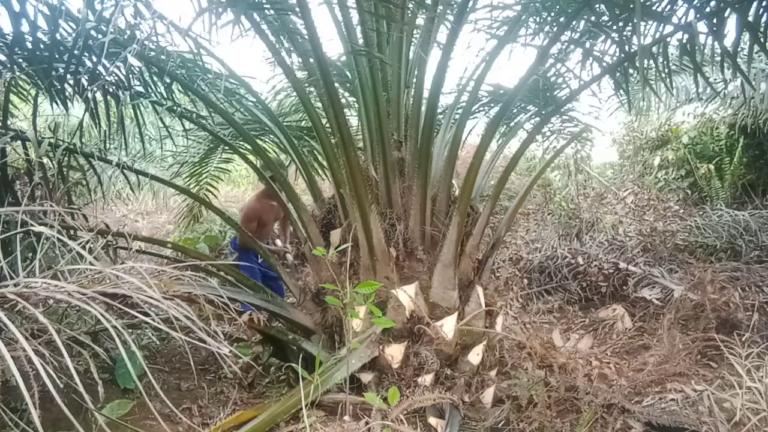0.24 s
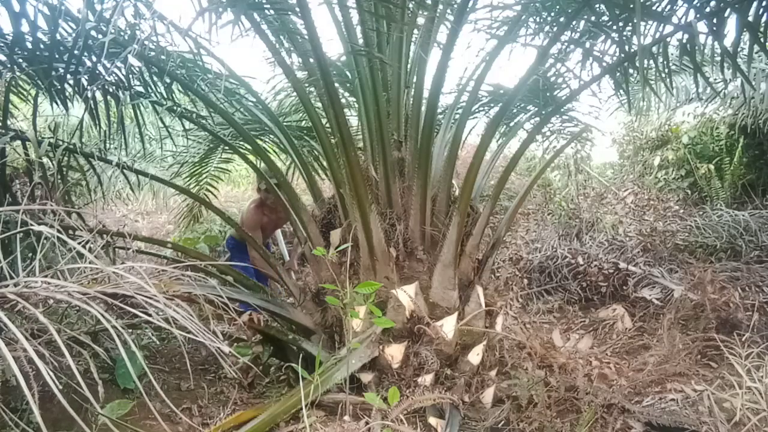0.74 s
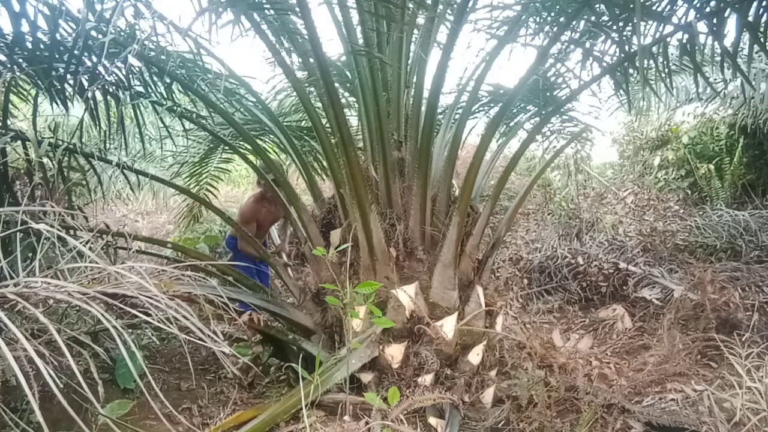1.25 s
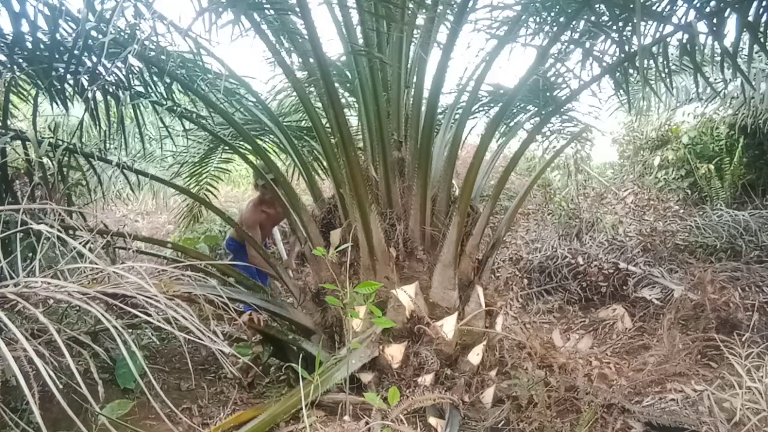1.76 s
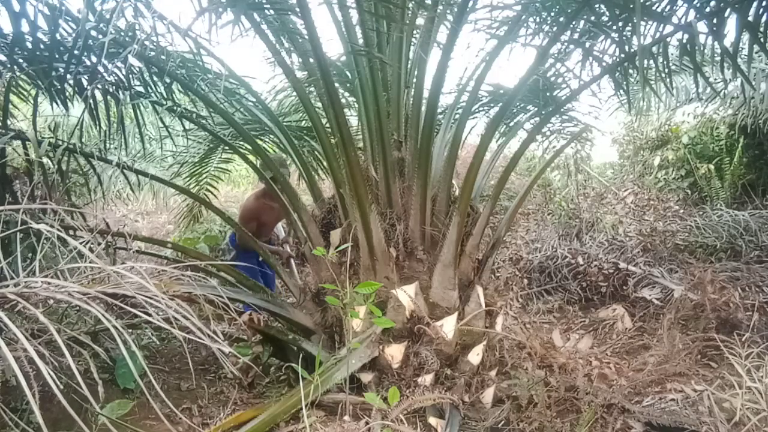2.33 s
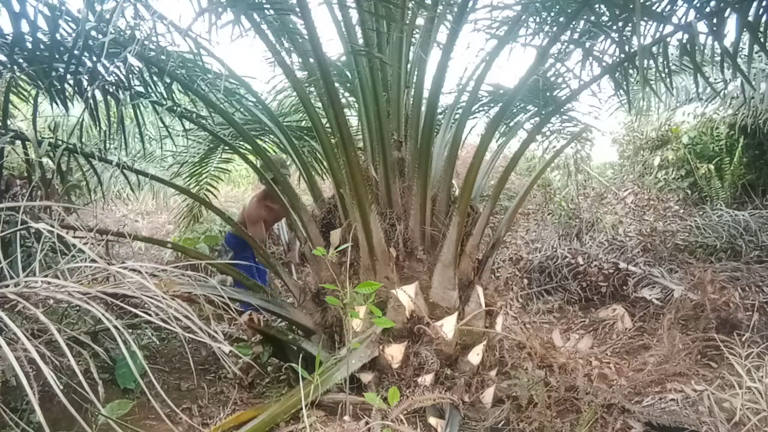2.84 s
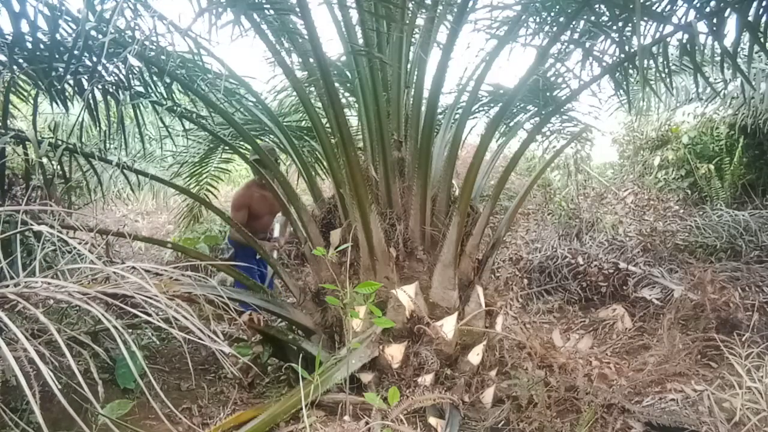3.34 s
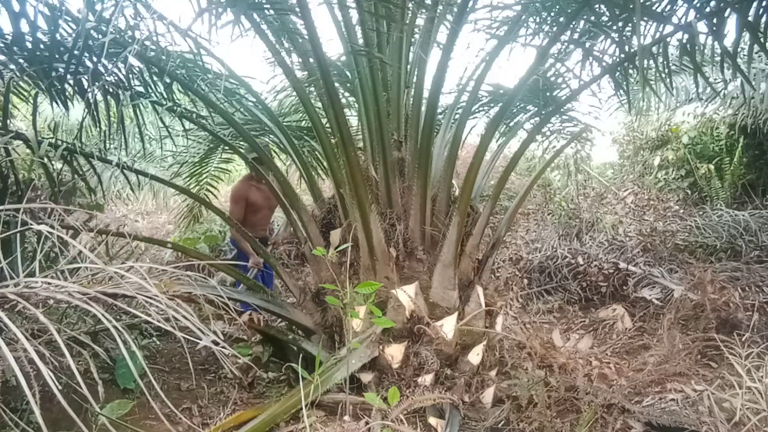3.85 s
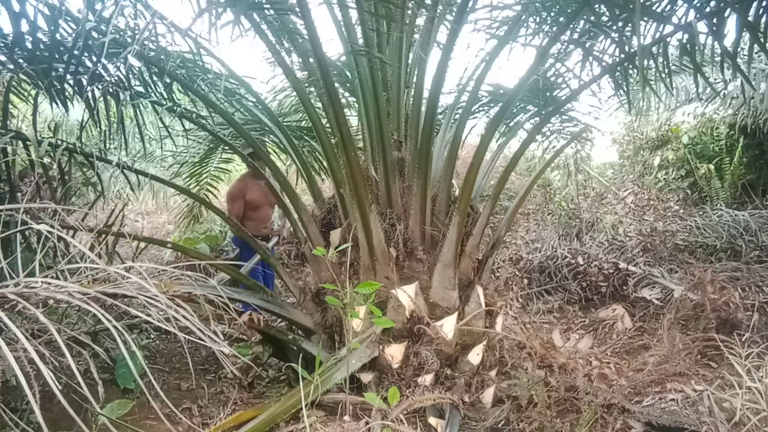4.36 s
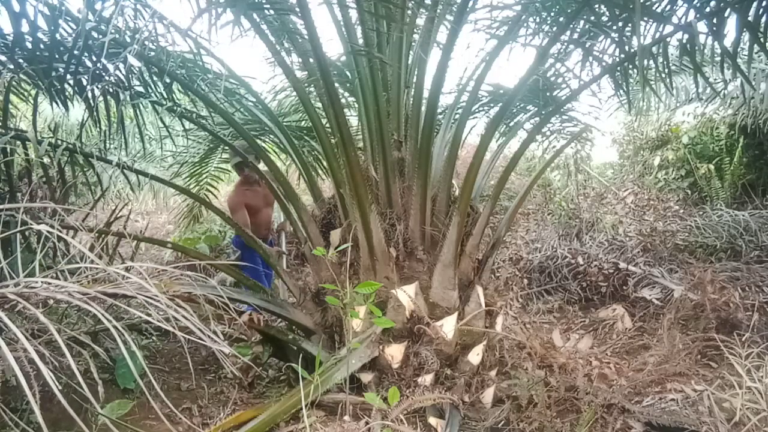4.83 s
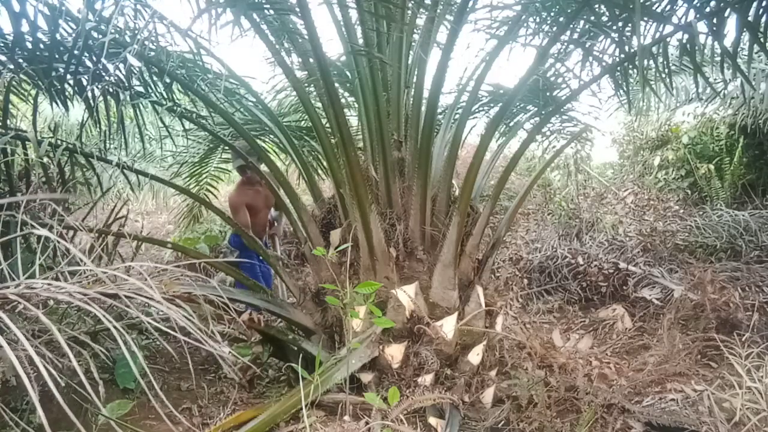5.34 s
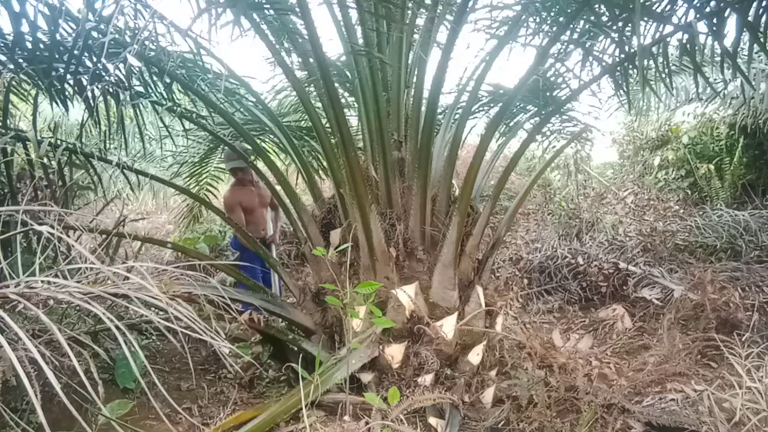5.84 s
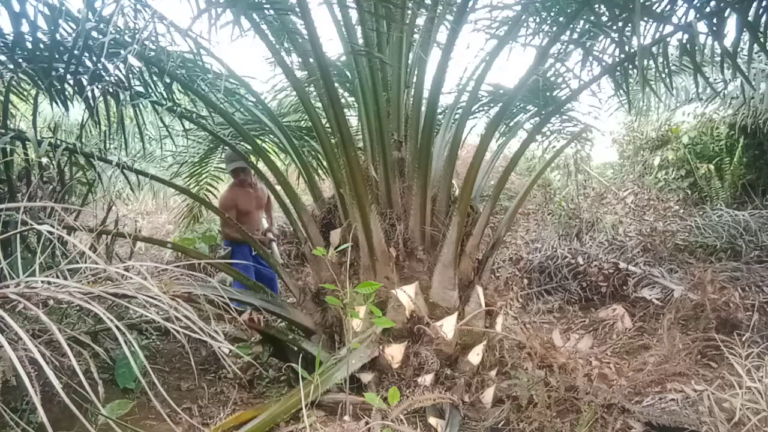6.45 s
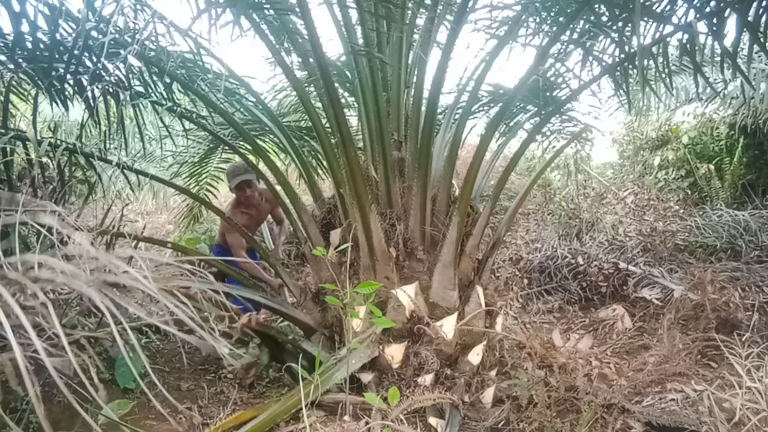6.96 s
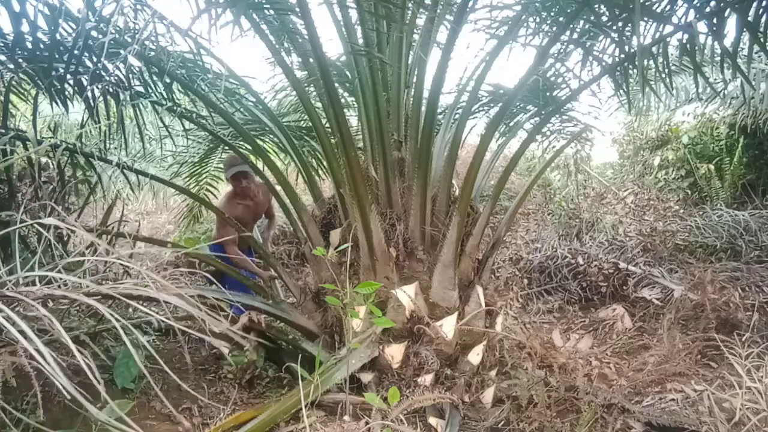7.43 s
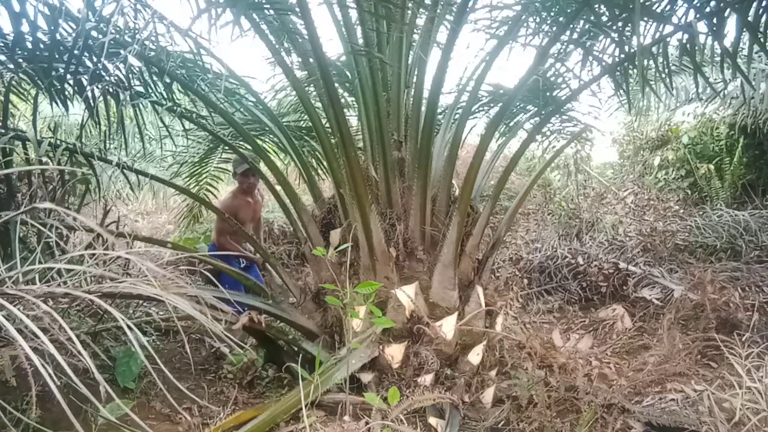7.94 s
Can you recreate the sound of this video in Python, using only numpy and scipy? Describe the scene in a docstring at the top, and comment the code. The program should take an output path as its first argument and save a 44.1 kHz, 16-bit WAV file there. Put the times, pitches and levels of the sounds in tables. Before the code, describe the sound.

Leaves rustle from the start under constant high insect buzzing. Irregular chops follow, each a quick crunch of ripping fibres with a damped knock on the stalk, a brief high steel ring and a swish of fronds. Soft blade slides and dull bumps fill the gaps. The cutting is several metres from the microphone in an open plantation, with a faint foliage echo.

```python
"""A worker prunes an oil palm with a steel chisel on a pole, some metres away in a plantation.
From the start, a shrill band of insects, a low rumble and hiss in the air, and leaves already rustling.
Soon the blade slides on the cut; the first thrust comes near 0.7 s and others follow every second or so.
Each tears wet fibres (noise crackle), knocks the stalk (damped jolts), rings the blade (resonances) and shakes
the leaves; those near 3.7 and 7 s tear hardest, then a weaker one near 7.6 s, with leaves still rustling."""
import sys
import numpy as np
from scipy import signal
from scipy.fft import rfft, irfft, next_fast_len
from scipy.io import wavfile

SR = 44100
rng = np.random.default_rng(int(sys.argv[2]) if len(sys.argv) > 2 else 0)


def transcribe(u):
    """Save the signal u as a 16-bit wav file named by the first command-line argument.

    u: samples, shape (n,) or (channels, n), limited to [-1, 1]; the rate is SR.
    q: integer samples, one column per channel.
    """
    v = np.clip(np.atleast_2d(u).T, -1, 1)
    q = np.round(v * 32767).astype(np.int16)
    wavfile.write(sys.argv[1], SR, q)


N = 361179
TIME_S = np.arange(N) / SR

# distant air, spectrum: hz, relative_db
AIR_SPECTRUM = [(20, -32.5), (50, -7), (100, 5.5), (200, 0), (350, -7), (700, -14), (1300, -20.5),
                (3000, -19), (6000, -17.5), (9000, -36), (16000, -53)]
# faint wavering whine: hz, width_hz (doubled in each of two cascaded resonators), level_db
WHINE = (1250, 90, -85)
# insect band and its octave, spectrum: hz, relative_db
INSECT_SPECTRUM = [(5000, -43), (5900, -22), (6600, -22.5), (6850, -2.5), (7200, 3.5), (7650, 1.5),
                   (8100, -11.5), (8600, -25.5), (9200, -52.5), (13600, -52.5), (14500, -36), (15500, -34)]
# brushing leaflets, spectrum: hz, relative_db
LEAF_SPECTRUM = [(30, -41.5), (100, -14), (400, -15), (900, -12), (1600, -12.5), (2400, -13), (4000, -5),
                 (6000, 0), (7500, -5), (9000, -15.5), (12000, -30.5), (16000, -28)]
# fronds set swaying: start_s, rise_s, t60_s, level_db
SWAYS = [(0.0, 0.0017, 0.87, -55), (0.232, 0.0087, 0.65, -54), (0.43, 0.056, 1.2, -61),
         (0.7, 0.017, 0.19, -42), (1.13, 0.045, 0.87, -51.5), (1.8, .03, 2.4, -54), (2.03, 0.11, 2.2, -53),
         (2.751, 0.043, 1.01, -44), (3.2, 0.09, 2, -64), (3.601, 0.0044, 1.7, -34.5),
         (3.728, 0.046, 0.72, -28), (4.06, 0.097, 0.93, -44.5), (4.598, 0.018, .25, -97),
         (4.933, 0.0065, 0.59, -37), (5.42, 0.028, 1.2, -53), (5.52, 0.064, 0.33, -45.5),
         (5.891, 0.011, 0.93, -43), (6.61, 0.23, 0.78, -50.5), (6.941, 0.04, 0.96, -31),
         (7.4, 0.25, 0.66, -53), (7.75, .35, 1.4, -57.5)]
# steel blade modes: hz, width_hz (halved while sliding), gain_db
BLADE_MODES = [(3500, 25, -25.5), (3150, 27, -12), (3970, 43, -17.5), (4030, 18, -8), (5200, 37, -17.5),
               (5410, 12, -0.5), (5870, 14, 11), (6990, 16, 3.5)]
# blade sliding or clinking: start_s, rise_s, t60_s, level_db
SLIDES = [(0.252, 0.022, 0.43, -60.5), (1.195, 0.061, 0.61, -53.5), (2.21, 0.028, 0.61, -50),
          (3.604, 0.0024, 0.12, -50), (5.505, 0.0075, 0.51, -50.5)]
# dull bumps of stalks and trunk: start_s, level_db, pitch_hz
BUMPS = [(1.161, -62, 443), (1.202, -61, 700), (2.142, -51.5, 435), (2.191, -58, 850), (2.742, -54, 75),
         (2.964, -48.5, 460), (2.992, -54, 623), (3.826, -46.5, 93), (4.945, -45.5, 147),
         (4.99, -52.5, 282), (5.33, -65, 650), (5.517, -55, 110), (5.769, -61.5, 200), (7.022, -47.5, 310),
         (7.427, -57.5, 694), (7.57, -61, 150)]
# hard rind splitting: start_s, level_db
SPLITS = [(0.258, -49), (0.709, -24), (1.757, -35.5), (1.818, -39), (2.654, -43), (3.772, -35.5),
          (3.795, -37.5), (5.889, -40.5)]
# edge driven into a stalk: start_s, rise_s, length_s, relative_tear_db, knock_db, knock_pitch_hz
CHOPS = [(0.676, 0.015, 0.036, -20.5, -39.5, 520), (0.704, 0.0038, 0.011, -21, -29.5, 320),
         (0.761, .005, 0.015, -32.5, -32, 580), (1.742, 0.0079, 0.026, -24, -39.5, 500),
         (1.804, .002, 0.018, -29, -32, 616), (1.862, .002, 0.0032, -43, -49, 900),
         (2.651, .001, 0.023, -38.5, -51.5, 340), (2.674, .008, 0.021, -26, -41.5, 686),
         (2.702, 0.0054, 0.02, -26.5, -33, 700), (3.602, 0.00088, 0.0015, -35, -42, 330),
         (3.766, 0.0033, .011, -23.5, -39.5, 517), (4.931, 0.0028, 0.013, -24.5, -31, 620),
         (5.509, .001, 0.0194, -37.5, -44, 190), (5.89, 0.0008, 0.0053, -30.5, -45, 246),
         (6.926, 0.0028, 0.0061, -17.5, -27, 828), (6.938, .004, 0.017, -19.5, -24, 760),
         (6.952, .002, 0.0076, -19, -21.5, 420), (6.982, .003, 0.0043, -31, -27, 620),
         (7.559, 0.0029, 0.011, -37.5, -40, 250)]
# fibre strips ripping without a knock: start_s, relative_tear_db, tilt_db_per_octave
RIPS = [(1.492, -39, 4.5), (1.539, -44, 4), (1.604, -43.5, 4), (2.192, -42.5, -0.5), (2.867, -37, -1),
        (3.676, -24.5, 10.5), (3.749, -28, 11), (3.807, -23, 8.5), (3.846, -23, 7.5), (4.468, -43, 4),
        (5.443, -44, 2.5), (5.585, -43, 7), (5.791, -38.5, 0.5), (6.985, -23, 7.5), (7.057, -33, 4)]
# tearing fibres, spectrum before tilt: hz, relative_db
FIBRE_SPECTRUM = [(40, -49.5), (110, -8.5), (400, -21.5), (1100, -12), (1550, -10), (1900, -9),
                  (2600, -6.5), (4200, 0.5), (6300, 1.5), (7500, 0.5), (8500, -12), (11000, -22.5),
                  (16000, -30.5)]
# thick fibres parting: start_s, peak_db
SNAPS = [(0.709, -18), (1.4933, -31.5), (3.6027, -11.5), (3.6825, -29), (3.768, -18), (3.845, -17.5),
         (4.9369, -18.5), (5.7925, -34), (6.9893, -17), (6.9955, -14), (7.0598, -29)]
# ring of a parting fibre: hz, width_hz (of each of two cascaded resonators), relative_db
SNAP_MODES = [(4200, 1600, 3.5), (6030, 320, 10), (4630, 110, 0), (6300, 130, -29.5)]
# microphone port resonances: hz, width_hz, boost_db
PORT_MODES = [(1252, 62, 8.5), (15110, 890, 18)]

AIR_DB, INSECT_DB = -70.5, -47
SWAY_HOLD_S = 0.042
SLIDE_HOLD_RATIO = 0.97  # hold / rise
KNOCK_LAG_S = 0.003004  # before the one-cycle advance in wood()
THUD_HZ, THUD_REL_KNOCK_DB, THUD_LAG_S, THUD_LENGTH_S = 205, -16, 0.005, 0.015
RIND_HZ, RIND_LENGTH_S = 2030, 0.0056
BUMP_LENGTH_S = 0.02
CHOP_T60_S, CHOP_TILT_DB_PER_OCTAVE = 0.13, -1.24
RIP_RISE_S, RIP_HOLD_S, RIP_T60_S = 0.0011, 0.0094, 0.11
CUTOFF_HZ = 15550


def from_db(db):
    """Decibels to gain."""
    return 10 ** (np.asarray(db) / 20)


def rms_one(x):
    """Scale to unit power."""
    return x / np.sqrt(np.mean(x ** 2) + 1e-20)


def add(out, start_s, sound):
    """Mix a sound in from start_s."""
    start = max(round(start_s * SR), 0)
    out[start:start + len(sound)] += sound[:max(N - start, 0)]


def colour(x, spectrum, tilt_db_per_octave=0):
    """Impose a tilted spectrum; unit power."""
    hz, level_db = np.transpose(spectrum)
    size = next_fast_len(len(x))
    octave = np.log2(np.maximum(np.fft.rfftfreq(size, 1 / SR), 1))
    gain_db = np.interp(octave, np.log2(hz), level_db) + tilt_db_per_octave * octave
    return rms_one(irfft(rfft(x, size) * from_db(gain_db), size)[:len(x)])


def wander(size, per_s):
    """Random curve: unit-spread values, per_s a second, joined by lines."""
    values = rng.standard_normal(size)
    return np.interp(np.arange(size) * per_s / SR, np.arange(size), values)


def resonate(x, hz, width_hz):
    """Two-pole resonance with gain 1 at its top."""
    r = np.exp(-np.pi * width_hz / SR)
    zeros = np.array([1, 0, -1]) * (1 - r * r) / 2
    poles = [1, -2 * r * np.cos(2 * np.pi * hz / SR), r * r]
    return signal.lfilter(zeros, poles, x + 1e-18)


def crackle(size, per_s, spread_db, clump_db):
    """Tiny snaps of uneven strength that come in clumps."""
    born = rng.random(size) < per_s / SR
    strength_db = spread_db * rng.random(size) + clump_db * wander(size, 490)
    return born * rng.standard_normal(size) * from_db(strength_db)


def stroke(t_s, rise_s, hold_s, t60_s):
    """Force builds up, holds, then dies away exponentially."""
    rise = np.clip(t_s / rise_s, 0, 1) ** (3 / 4)
    return rise * from_db(-60 * np.maximum(t_s - rise_s - hold_s, 0) / t60_s)


def scatter(x, spread_s, share_db):
    """Many slightly delayed paths ripple the spectrum."""
    t_s = TIME_S[:SR // 8]
    paths = rng.standard_normal(len(t_s)) * np.exp(-t_s / spread_s)
    delayed = signal.fftconvolve(x, paths / np.linalg.norm(paths))[:N]
    share = from_db(share_db)
    return (x + share * delayed) / np.hypot(1, share)


def open_air():
    """Low distant rumble and soft hiss from shaped noise; faint whine from resonated noise."""
    hz, width_hz, level_db = WHINE
    whine = resonate(resonate(rng.standard_normal(N), hz, 2 * width_hz), hz, 2 * width_hz)
    waver_db = 2 * wander(N, 26)
    air = from_db(AIR_DB) * colour(rng.standard_normal(N), AIR_SPECTRUM)
    return air + from_db(level_db + waver_db) * rms_one(whine)


def insects(flutter_db=1.05, flutter_per_s=130):
    """Many far insects merge into one shrill, fluttering band and its octave."""
    level_db = INSECT_DB + flutter_db * wander(N, flutter_per_s)
    return from_db(level_db) * colour(rng.standard_normal(N), INSECT_SPECTRUM)


def blade(drive):
    """Steel rings in its modes when rubbed or struck."""
    return sum(from_db(db) * resonate(drive, hz, width_hz) for hz, width_hz, db in BLADE_MODES)


def flicker(x, depth_db, per_s):
    """Bands swell and fade independently as different leaves touch; the top stays steady."""
    out, rest = 0, x
    for hz in np.geomspace(400, 6400, 5):
        low = signal.sosfiltfilt(signal.butter(3, hz, fs=SR, output="sos"), rest)
        out = out + low * from_db(depth_db * wander(N, per_s))
        rest = rest - low
    return out + rest


def leaflet_ticks(per_s, width_hz, count=30):
    """Stiff leaflets flick now and then, each ringing briefly at its own pitch."""
    pitches_hz = np.linspace(1900, 6600, count) + rng.normal(0, 60, count)
    ticks = 0
    for hz in pitches_hz:
        flicks = crackle(N, per_s, spread_db=0.5, clump_db=-4)
        ticks = ticks + hz * resonate(flicks, hz, width_hz)  # gain grows with pitch
    return rms_one(ticks)


def leaves(ring_db=-9):
    """Leaflets brush each other and the blade while the fronds sway."""
    power = sum((from_db(db) * stroke(TIME_S - start_s, rise_s, SWAY_HOLD_S, t60_s)) ** 2
                for start_s, rise_s, t60_s, db in SWAYS)
    touches = crackle(N, per_s=6000, spread_db=5, clump_db=2)
    brush = scatter(colour(touches, LEAF_SPECTRUM), spread_s=0.0027, share_db=-2)
    ticks = from_db(-8) * leaflet_ticks(per_s=16, width_hz=30)
    rustle = flicker(brush + ticks, depth_db=1.8, per_s=35)
    return np.sqrt(power) * rms_one(rustle + from_db(ring_db) * blade(rustle))


def slides(rasp_db=-9, shift_db=3):
    """Steel rubs the cut face; its modes swell and fade independently as the contact moves."""
    force = sum(from_db(db) * stroke(TIME_S - start_s, rise_s, SLIDE_HOLD_RATIO * rise_s, t60_s)
                for start_s, rise_s, t60_s, db in SLIDES)
    friction = rng.standard_normal(N)
    song = 0
    for hz, width_hz, db in BLADE_MODES:
        mode_db = db + shift_db * wander(N, 42)
        song = song + from_db(mode_db) * resonate(friction, hz, width_hz / 2)
    rasp = scatter(colour(friction, FIBRE_SPECTRUM), spread_s=0.012, share_db=32)
    return force * (rms_one(song) + from_db(rasp_db) * rasp)


def knock(length_s, hz, damping=0.38, loss_hz=130, top_ratio=1.535, bottom_ratio=0.4,
          jolts_per_s=520, count=64):
    """Wood gives way in quick jolts, each a heavily damped ring."""
    size = SR // 6
    jolt_s = (np.arange(count) + rng.random(count)) / jolts_per_s
    force = rng.choice([-1, 1], count) * stroke(jolt_s, 0.00056, length_s * 0.79, length_s * 3)
    jolts = np.bincount((jolt_s * SR).astype(int), force, size)[:size]
    body = resonate(jolts, hz, damping * hz + loss_hz)
    band_hz = [bottom_ratio * hz, top_ratio * hz + loss_hz]
    body = signal.sosfilt(signal.butter(4, band_hz, "band", fs=SR, output="sos"), body)
    return rms_one(body) * np.sqrt(length_s * SR / size)  # level refers to length_s


def wood():
    """Chops knock the stalk and thud through the trunk; rind splits and dull bumps add knocks."""
    out = np.zeros(N)
    for start_s, _, length_s, _, db, hz in CHOPS:
        stalk_s = start_s + KNOCK_LAG_S - 1 / hz  # one cycle earlier, to offset the filters' delay
        add(out, stalk_s, from_db(db) * knock(length_s, hz))
        thud = from_db(db + THUD_REL_KNOCK_DB) * knock(THUD_LENGTH_S, THUD_HZ)
        add(out, start_s + THUD_LAG_S, thud)
    for start_s, db in SPLITS:
        add(out, start_s, from_db(db) * knock(RIND_LENGTH_S, RIND_HZ))
    for start_s, db, hz in BUMPS:
        add(out, start_s, from_db(db) * knock(BUMP_LENGTH_S, hz))
    return out


def snaps(burst_t60_s=0.0017):
    """A thick fibre parts: a noise burst rings its modes in one bright crack."""
    out, t_s = np.zeros(N), TIME_S[:SR // 20]
    for start_s, peak_db in SNAPS:
        burst = rng.standard_normal(len(t_s)) * from_db(-60 * t_s / burst_t60_s)
        crack = 0
        for hz, width_hz, mode_db in SNAP_MODES:
            ring = resonate(resonate(burst, hz, width_hz), hz, width_hz)
            crack = crack + from_db(mode_db) * rms_one(ring)
        add(out, start_s, from_db(peak_db) * crack / np.abs(crack).max())
    return out


def tear(rise_s, hold_s, t60_s, tilt_db_per_octave):
    """Fibres snap at a rate of thousands a second as the edge goes through."""
    t_s = TIME_S[:SR // 2]
    breaks = crackle(len(t_s), per_s=9000, spread_db=2.5, clump_db=0)
    return stroke(t_s, rise_s, hold_s, t60_s) * colour(breaks, FIBRE_SPECTRUM, tilt_db_per_octave)


def fibres(level_db=-4, ring_db=-7):
    """Chops and rips tear the fibres, which sets the blade ringing."""
    out = np.zeros(N)
    for start_s, rise_s, length_s, db, _, _ in CHOPS:
        hold_s = max(length_s - rise_s, 0)
        add(out, start_s, from_db(db) * tear(rise_s, hold_s, CHOP_T60_S, CHOP_TILT_DB_PER_OCTAVE))
    for start_s, db, tilt in RIPS:
        add(out, start_s, from_db(db) * tear(RIP_RISE_S, RIP_HOLD_S, RIP_T60_S, tilt))
    return from_db(level_db) * (out + from_db(ring_db) * blade(out))


def grove(x, wet_db=-13, t60_s=0.24, spread_s=0.032, dull_hz=6000):
    """Trunks and foliage scatter back a thin, quickly fading echo."""
    t_s = TIME_S[:SR]
    echoes = crackle(len(t_s), per_s=2100, spread_db=5, clump_db=-3.5)
    echoes = echoes * stroke(t_s, spread_s, 0.005, t60_s)
    lowpass = signal.butter(1, dull_hz, fs=SR, output="sos")
    echoes = signal.sosfilt(lowpass, echoes / np.linalg.norm(echoes))
    return from_db(wet_db) * signal.fftconvolve(x, echoes)[:N]


def scene():
    """Open air, insects, leaves, the work at the palm and its echo."""
    background = open_air() + insects() + leaves()
    knocking = wood()
    cutting = slides() + snaps() + scatter(fibres(), spread_s=0.014, share_db=-9.5)
    echo = grove(cutting + from_db(-13) * knocking)
    return (background + knocking + cutting + echo)[None]


def record(dry):
    """The microphone port rings at two pitches; the top is cut."""
    port = sum((from_db(db) - 1) * resonate(dry, hz, width_hz) for hz, width_hz, db in PORT_MODES)
    lowpass = signal.ellip(10, 0.3, 70, CUTOFF_HZ, fs=SR, output="sos")
    return signal.sosfilt(lowpass, dry + port)


dry = scene()
out = record(dry)
transcribe(out)
```